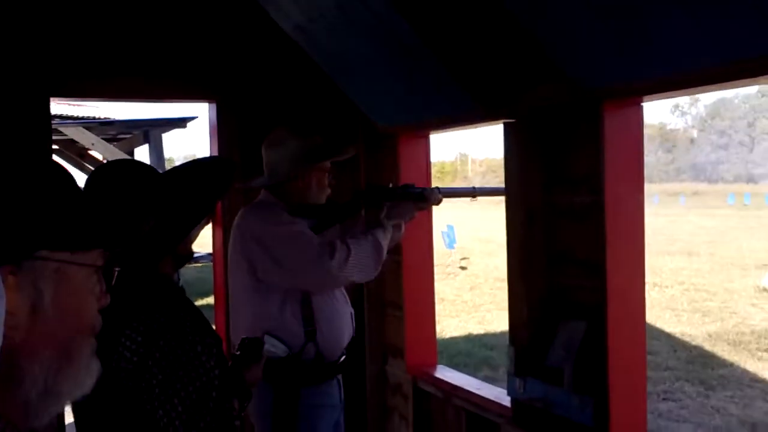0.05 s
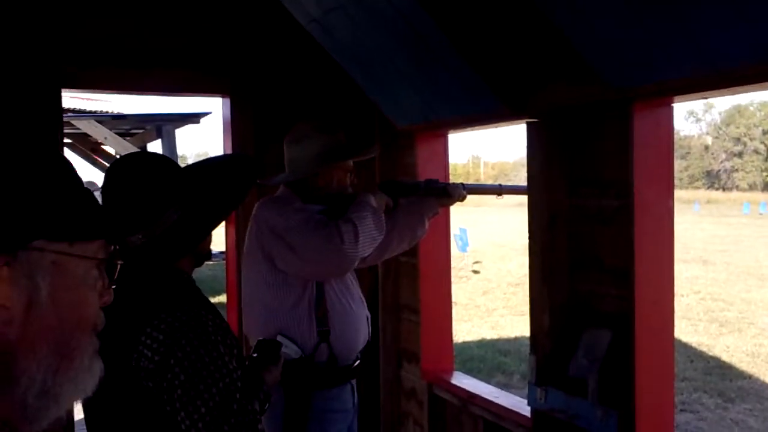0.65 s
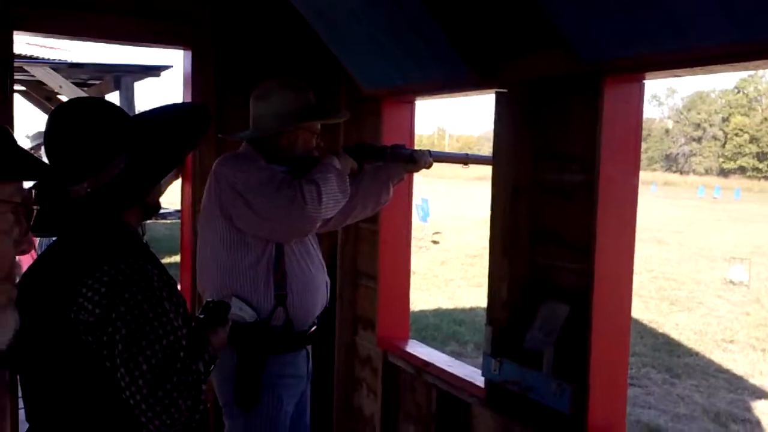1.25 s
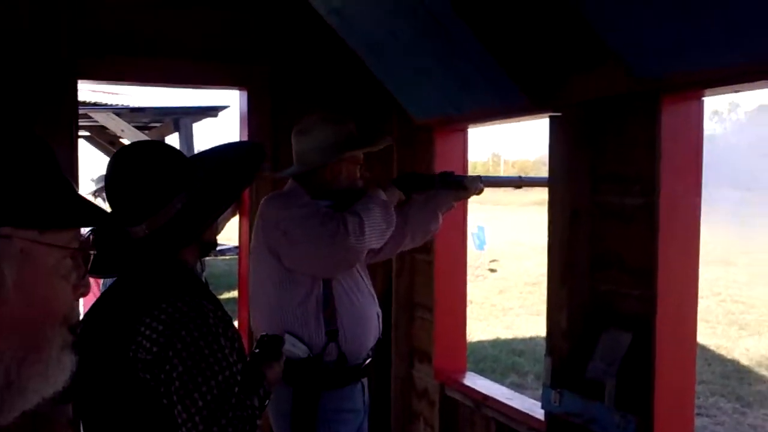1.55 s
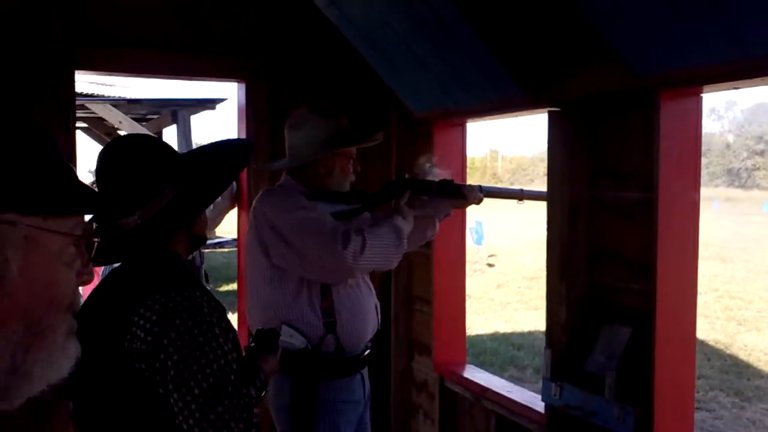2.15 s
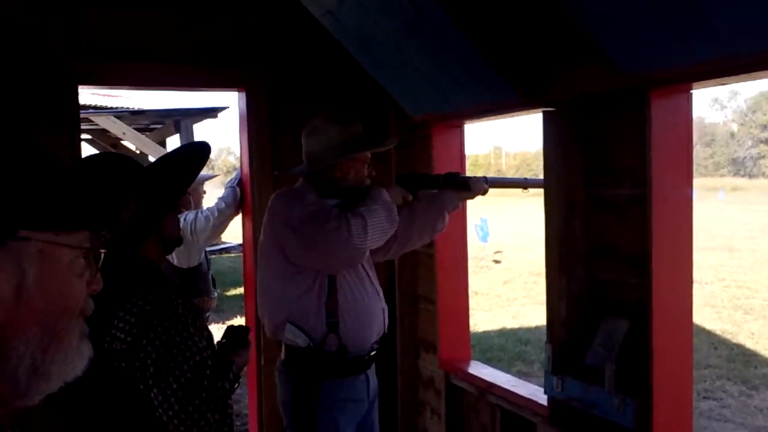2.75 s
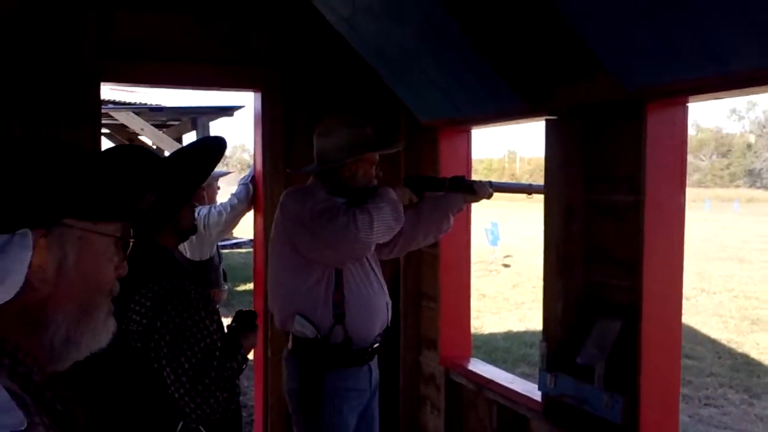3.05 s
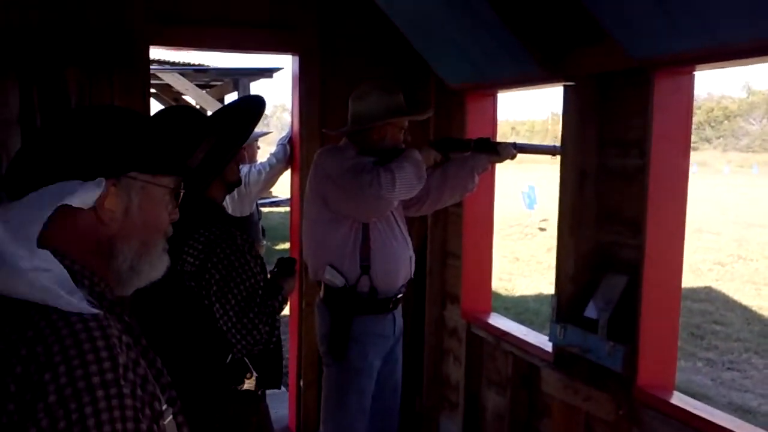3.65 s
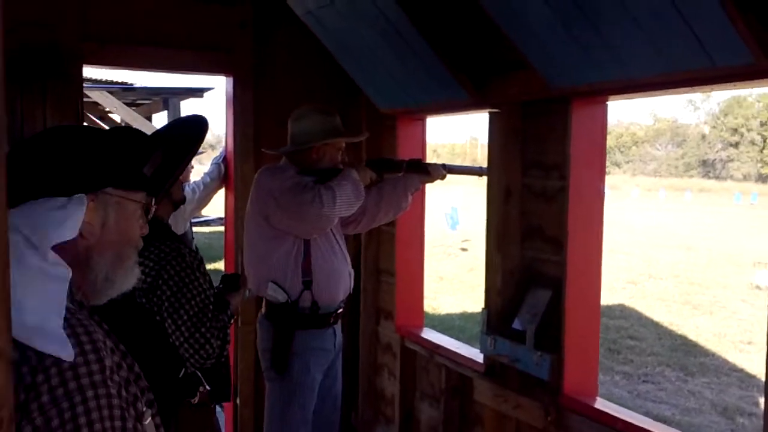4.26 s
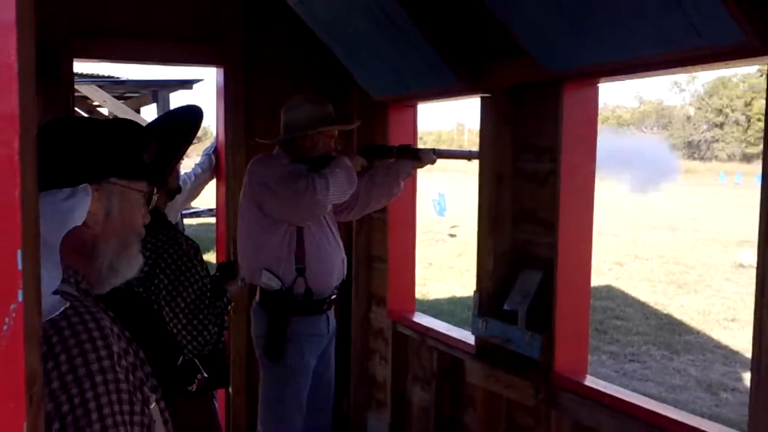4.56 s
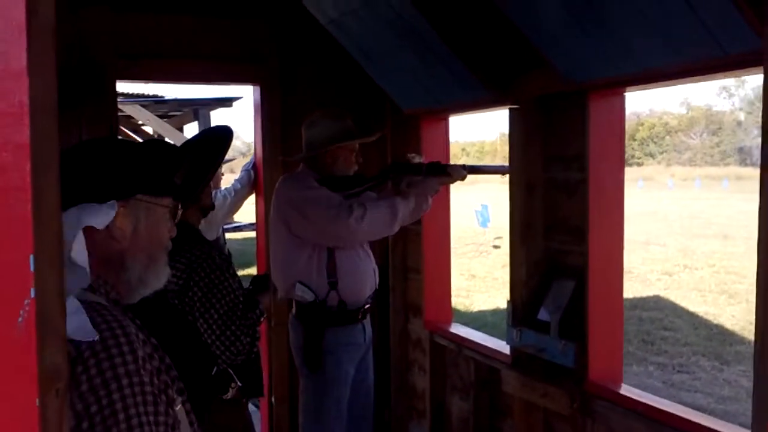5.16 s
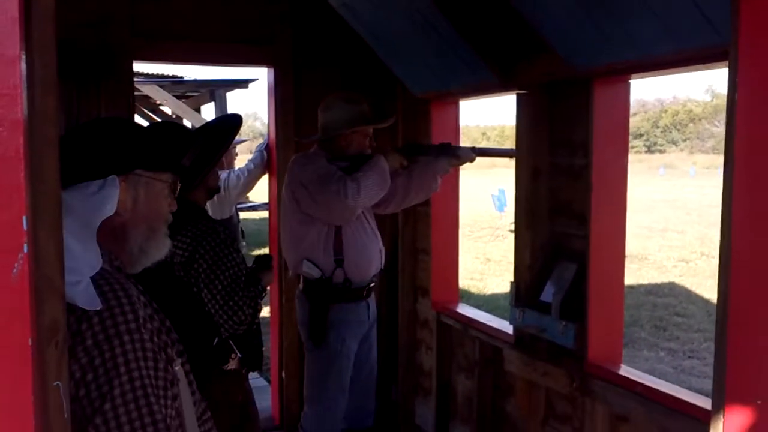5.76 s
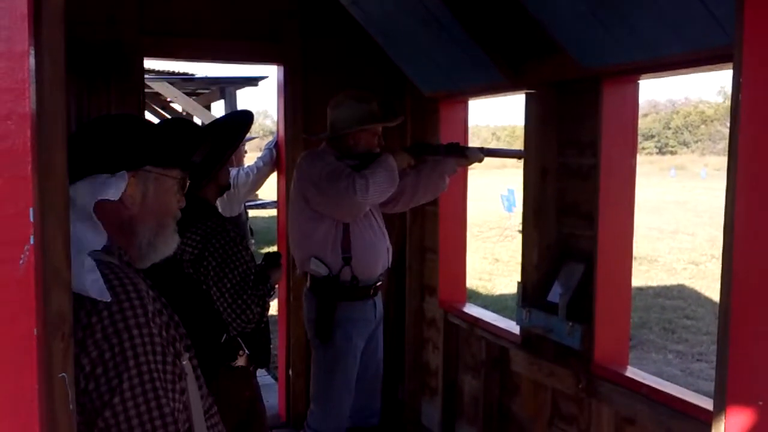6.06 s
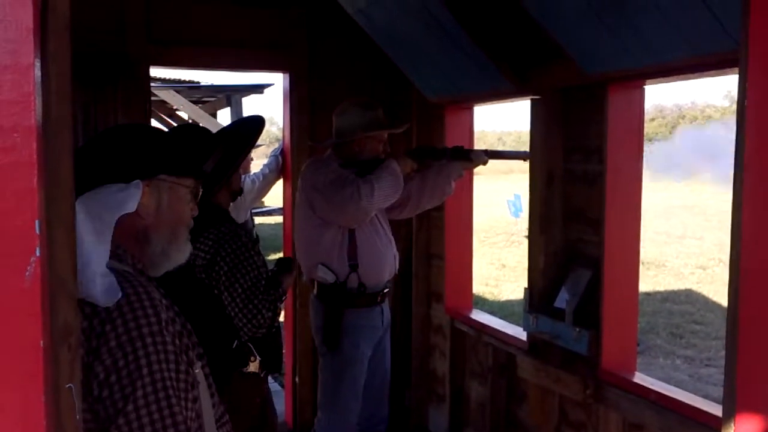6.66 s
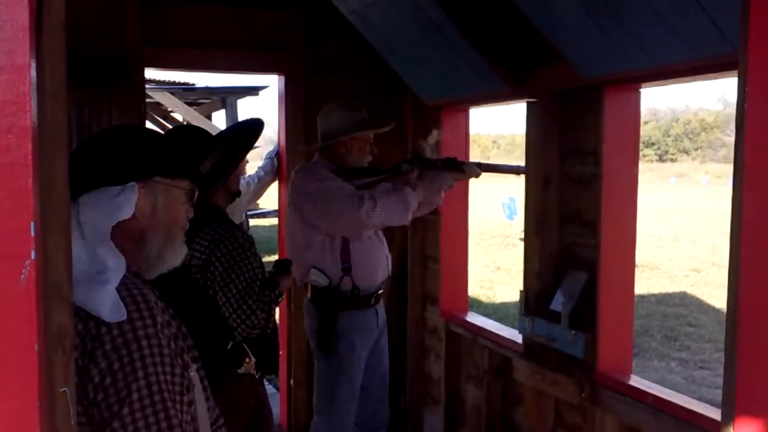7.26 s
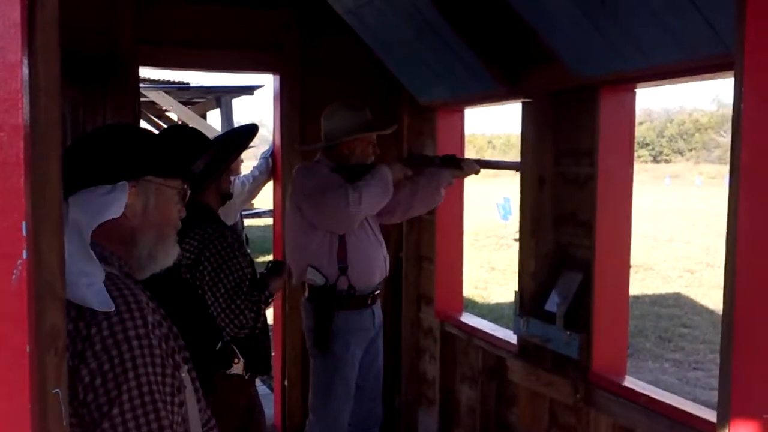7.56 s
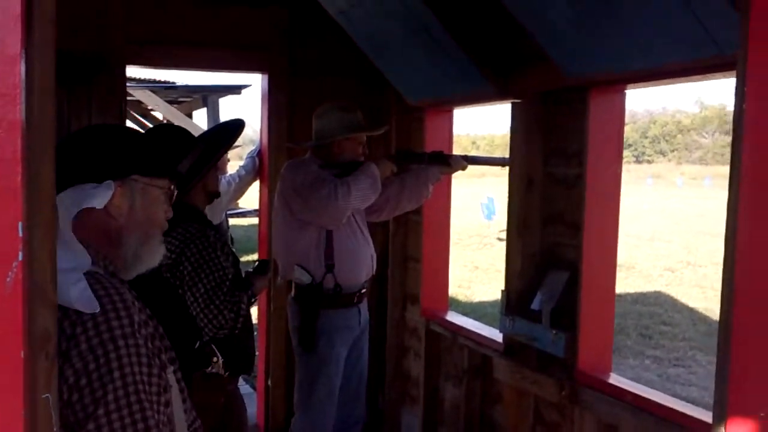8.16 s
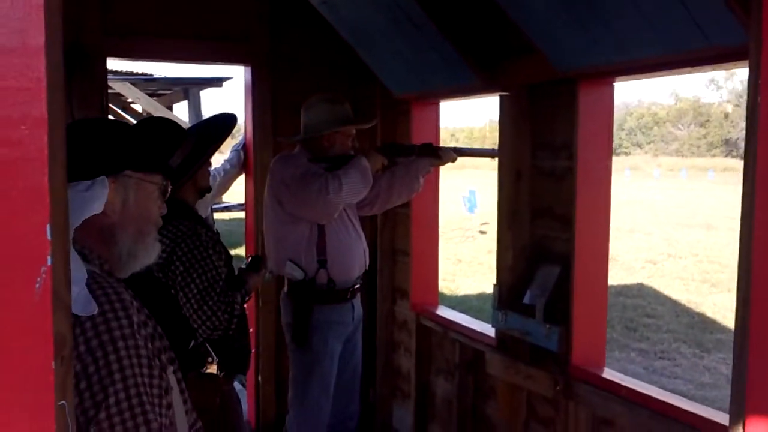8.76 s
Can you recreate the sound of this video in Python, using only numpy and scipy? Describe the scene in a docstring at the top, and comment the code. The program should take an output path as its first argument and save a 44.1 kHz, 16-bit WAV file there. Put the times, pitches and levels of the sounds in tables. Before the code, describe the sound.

A fading gunshot echo and a ringing steel target give way to a rifle lever clacking and a brass case landing. Three close, distorted rifle shots then boom through a wooden shed and roll back from down range, each answered by a plate's ring and the lever opening and shutting. Neighbouring and distant guns fire throughout while low wind puffs buffet the microphone. A faint jingle precedes one final shot.

```python
"""Outdoor range, from inside a wooden shed: a small camera microphone beside a lever-action rifle.
We open on a shot's echo and a ringing steel plate; the lever clacks, the next bay fires, a case falls.
Wind flutters on the microphone and guns pop down the line. Three more blasts from the window overload it,
each booming in the shed and rolling back from berm and trees, followed by a plate and the lever.
Late on, two more cases land faintly, loose metal jingles, and a last blast goes off just before the end."""
import sys
import numpy as np
from scipy import signal
from scipy.fft import rfft, irfft
from scipy.io import wavfile

SR = 44100
rng = np.random.default_rng(int(sys.argv[2]) if len(sys.argv) > 2 else 0)


def store_wav(level_fs):
    """Save 16-bit WAV to argv[1]."""
    pcm = np.round(np.clip(np.atleast_2d(level_fs), -1, 1) * 32767)
    wavfile.write(sys.argv[1], SR, pcm.T.astype(np.int16))


N = 396900

# Decay in the shed and off the trees. Each row: frequency in Hz, t60 in seconds at a stretch of 1.
SHED_RING = [(60, 1.87), (400, 1.38), (1500, 1.235), (4500, 1.26), (10000, 0.97)]
TREES_RING = [(100, 3.6), (800, 2.41), (2000, 1.66), (4500, 1.31), (10000, 1)]

# Noise spectra at the microphone. Each row: frequency in Hz, relative density in dB.
AIR_SPECTRUM = [(25, -10), (90, -3), (300, -6), (900, -4), (1800, -16), (3500, -18.5), (6000, -18),
                (9000, -11), (11000, -17)]
WIND_SPECTRUM = [(20, -17), (45, 5), (90, 4), (150, 2.5), (290, -6), (420, -16.5), (700, -14.5),
                 (2000, -51), (10000, -84)]
PUFF_SPECTRUM = [(20, -18), (60, -7.5), (130, 1), (280, 0.5), (380, -7.5), (520, -18.5), (1000, -36),
                 (10000, -80)]
TICK_SPECTRUM = [(100, -10), (1500, -16), (4300, -15), (5300, 1), (6300, -7), (8200, 1), (11000, -15)]
CLACK_SPECTRUM = [(40, -8), (200, -18.5), (500, -11), (1000, -6.5), (2200, -1), (4000, 0), (6500, 1),
                  (8200, 1), (9700, 3), (11000, -5)]
FAR_SPECTRUM = [(40, -26), (300, -11), (550, -15), (850, 0), (1400, 0), (2400, 0.5), (3500, -2.5),
                (5500, -1), (8000, 2.5), (11000, -1.5)]
THUMP_SPECTRUM = [(20, -29), (70, 7.5), (150, -6.5), (350, -2.5), (600, -13.5), (1500, -13.5),
                  (8000, -44.5)]
CRACK_SPECTRUM = [(30, -13), (120, -1.5), (400, -8), (1200, -4), (3000, -7.5), (6000, -9.5), (9000, -3.5),
                  (11000, -10)]
BERM_SPECTRUM = [(30, -18), (150, -13), (420, -15.5), (750, -4.5), (1250, 2.5), (1900, 2.5), (2800, -5.5),
                 (3700, -3), (5000, -7), (8000, -5.5), (11000, -8)]
TREES_SPECTRUM = [(30, -32), (130, -38), (420, -22), (720, -1.5), (1050, -1), (1350, -1), (1900, -1),
                  (2500, -3), (3100, -5.5), (6500, -8), (8500, -7), (11000, -19)]
BLAST_SPECTRUM = [(25, -17), (70, -7), (250, -6.5), (600, -1.5), (1100, 0), (1900, 0), (3000, -2),
                  (4700, -4), (8500, -0.5), (11000, -4)]

# Modes of struck metal. Each row: frequency in Hz, relative level in dB, t60 in seconds.
TINKLE_MODES = [(4340, 0, .35), (5160, -10, .3)]
HIGH_RING_MODES = [(3660, -19, .5), (4851, -7, .6), (5551, -10, .55), (6123, -7, .55), (6230, -8, .55),
                   (6583, -5, .6), (6785, -8, .6), (6990, -7, .5), (7390, -7, .5), (7585, -7, .5),
                   (7850, -4, .55), (7950, -5, .45), (8200, -4, .45), (8520, -4, .5), (8715, -1, .5),
                   (8950, -2, .5), (9125, -6, .5), (9280, -8, .45), (9440, -8, .45), (9591, -2, .5),
                   (9890, -9, .45), (10358, -12, .4)]
THIN_PLATE_MODES = [(824, -10, 0.098), (2330, -8, 0.052), (5023, -13.5, 0.27), (7140, -20, 0.15)]
CASE_LOW_MODES = [(3170, -8, 1.1), (4600, -3, .35), (5030, -4, .55), (5620, -5, .4), (6220, -7, .4),
                  (6790, -6, .4), (7430, -6, .4)]
CASE_BRIGHT_MODES = [(8073, -2, .3), (8537, 0, .38), (9630, -18, .4)]
# Loose metal and the rifle's steel action. Each row: centre in Hz, width in Hz, relative level in dB.
JINGLE_RESONANCES = [(5150, 50, -3), (5280, 60, 0), (5500, 50, -2), (5680, 50, -7), (6950, 90, -10),
                     (7500, 70, -9)]
ACTION_RESONANCES = [(4720, 54, -17), (5850, 120, -12), (6800, 300, -20), (8040, 960, 1), (8730, 120, -13),
                     (9100, 150, -9), (9880, 380, -6)]

# Wind on the microphone, its course and its strongest puffs. Each row: time in seconds, level in dB.
GUSTS = [(0, -36.5), (.75, -39), (1.1, -65), (2.38, -62), (2.48, -33), (2.85, -49), (3.3, -41), (3.75, -31),
         (4.5, -30.5), (4.6, -40.5), (5.7, -30.5), (6.25, -32.5), (6.7, -31.5), (7.3, -42), (7.95, -33.5),
         (8.7, -34.5), (8.8, -56), (8.9, -32)]
PUFFS = [(3.813, -19.5), (3.881, -22), (4.023, -23.5), (4.144, -25), (4.238, -22), (5.339, -19),
         (5.704, -24), (5.861, -21.5), (6.058, -20.5), (6.122, -19.5), (6.267, -22.5), (8.036, -27)]
# Small metal sounds. Each row: start in seconds, level in dB.
JINGLES = [(3.9575, -40), (7.935, -41), (8.2857, -30), (8.306, -35), (8.401, -34), (8.878, -39)]  # the clearest touches of loose metal
TINKLES = [(8.635, -41), (8.77, -44)]  # faint, lingering tones
THIN_PLATE_HITS = [(6.3695, -14)]  # far down range
CASE_BOUNCES = [(.7387, 1.5), (.825, -17), (1.09, -28), (1.268, -50)]
# Guns down the line. Each row: start in seconds, level in dB, decay stretch, treble cutoff in Hz.
FAR_SHOTS = [(.715, -12, 0.4, 4000), (0.9, -5, 0.1, 2200), (1.266, -14, 0.11, 3430),
             (1.415, -9.5, 0.19, 3460), (2.2669, -5.5, .14, 3650), (2.7866, 2.5, .2, 3950),
             (5.934, -.5, .19, 4700), (6.367, -12, 0.22, 2660), (6.6236, -23, 0.26, 2620),
             (6.681, -29, 0.39, 2780), (7.299, -6, .08, 2630), (7.9806, -1.5, 0.21, 4660),
             (8.433, -10.5, 0.23, 1940), (8.623, -19, 0.19, 2700), (8.679, -23, 0.36, 2380)]
# The gun next door. Each row: start in seconds, crack in dB, echo delay in seconds, berm slap in dB.
NEXT_BAY_SHOTS = [(.541, -6.5, .18, -6), (1.675, -14, .18, -5.5), (3.002, -5.5, .172, -2),
                  (5.131, -6, .16, -9.5)]
# Ringing metal: loud hits on steel plates, and two faint high rings of spent cases landing.
# Each row: start in seconds, impact in dB, ring in dB.
METAL_HITS = [(-.03, -5, -6), (1.868, -8, -5), (4.9233, -3, -12), (5.3262, 1, -0.5), (6.143, -44, -35),
              (7.0387, 2, -2.5), (7.8213, -33, -35.5)]
# Working the lever. Each row: times fully open and locked shut in seconds, level in dB,
# lengths of the opening and closing strokes in seconds.
LEVER_CYCLES = [(.2154, .4888, 0, .037, .074), (2.111, 2.4318, 0, .029, .061),
                (5.2868, 5.5706, -1, .031, .055), (7.257, 7.5625, -1, .042, .059)]
# Contacts in a stroke. Each row: offset from the stop in strokes, clack in dB, ring in dB, decay stretch.
OPENING_CONTACTS = [(-1, -14, -14, 0.64), (0, -6, -9.5, 0.2)]  # the bolt unlocks, then hits its rear stop
CLOSING_CONTACTS = [(-1, -18.5, -27, 0.38), (-.53, -18.5, -22, 0.36), (0, -5, -1, .25),
                    (0.92, -7.5, -25, .16)]  # carrier lifts, round feeds, bolt locks, lever seats
# The rifle, close up. Each row: start in seconds, blast in dB, decay stretch, berm in dB, trees in dB.
RIFLE_SHOTS = [(-.36, 12, .36, 0, -6.5), (1.546, 13, 0.43, 2.5, -5.5), (4.6777, 15, 0.3, -12, -14.5),
               (6.7655, 12.5, .37, -5.5, -5.5), (8.937, 12.5, 0.24, -7, -12)]


def undb(db):
    """Decibels to gain."""
    return 10 ** (np.asarray(db) / 20)


def unit(x):
    """Scale to rms 1."""
    return x / np.sqrt(np.mean(x ** 2))


def clock(seconds):
    """Sample times from zero."""
    return np.arange(int(seconds * SR)) / SR


def fade(t, t60):
    """Exponential decay by 60 dB in t60 seconds."""
    return np.exp(-np.log(1000) * t / np.maximum(t60, 1e-3))


def rise(t, seconds):
    """Exponential attack from 0 towards 1."""
    return 1 - np.exp(-t / seconds)


def add(out, at, x):
    """Mix x into out, starting at the given second."""
    start = int(round(at * SR))
    first, last = max(start, 0), min(start + len(x), N)
    if last > first:
        out[first:last] += x[first - start:last - start]


def along(points, hz):
    """Read (Hz, value) points on a log-frequency axis."""
    centres, values = np.transpose(points)
    return np.interp(np.log(hz + 1), np.log(centres), values)


def noise(t, colour):
    """Noise of rms 1 with the given spectrum."""
    db = along(colour, np.fft.rfftfreq(len(t), 1 / SR))
    white = rng.standard_normal(len(t))
    return unit(irfft(rfft(white) * undb(db), len(t)))


def walk(t, rate):
    """Random level of spread near 1 that moves rate times a second."""
    steps = rng.standard_normal(4096)
    return np.interp(t * rate, np.arange(len(steps)), steps)


def scattered(start, length, count):
    """Loosely spaced random moments, each with a random strength of spread 1."""
    jitter, size = rng.random((count, 2)).T
    times = start + length * (np.arange(count) + jitter) / count
    return times, np.sqrt(3) * (2 * size - 1)


def burst(t, colour, stretch=1, ring=SHED_RING, patchy_db=0):
    """Dense reflections: noise bands die away, each in its t60 times stretch, and flicker by patchy_db."""
    spectrum, hz = rfft(noise(t, colour)), np.fft.rfftfreq(len(t), 1 / SR)
    centres, t60s = np.transpose(ring)
    out = np.zeros(len(t))
    for weights, t60 in zip(np.eye(len(ring)), t60s):
        band = irfft(spectrum * along(np.c_[centres, weights], hz), len(t))
        out += band * fade(t, t60 * stretch) * undb(patchy_db * walk(t, 60.08))
    return out


def rattle(t, resonances):
    """A crowd of close, damped modes: noise confined to a few resonances."""
    hz = np.fft.rfftfreq(len(t), 1 / SR)
    gain = sum(undb(db) / (1 + (2 * (hz - centre) / width) ** 2) for centre, width, db in resonances)
    phases = np.exp(2j * np.pi * rng.random(len(hz)))
    return unit(irfft(gain * phases, len(t)))


def metal(modes, scatter_db, waver):
    """Struck metal: each blow weights the modes anew, and reflections make each one waver."""
    t = clock(1)
    freqs, db, t60s = np.transpose(modes)
    gains = undb(db + scatter_db * rng.standard_normal(len(freqs)))
    gains /= np.sqrt(np.sum(gains ** 2) / 2)
    out = np.zeros(len(t))
    for hz, gain, t60 in zip(freqs, gains, t60s):
        level = gain * fade(t, t60) * (1 + waver * walk(t, 70))
        phase = 2 * np.pi * (hz * t + rng.random()) + 2 * waver * walk(t, 70)
        out += level * np.sin(phase)
    return out


def wind(flutter_db=5, gust_db=-4, eddy_db=-1, eddies_per_s=5, puff_s=0.013, air_db=-46):
    """Eddies buffet the microphone in low puffs that grow with the wind, over steady outdoor air."""
    t, puff_t = np.arange(N) / SR, clock(0.16)
    course = np.transpose(GUSTS)
    out = noise(t, WIND_SPECTRUM) * undb(np.interp(t, *course) + gust_db + flutter_db * walk(t, 32))
    times, _ = scattered(0, N / SR, count=eddies_per_s * N // SR)
    eddies = list(zip(times, np.interp(times, *course) + eddy_db))
    middle = puff_t[-1] / 2
    swell = np.exp(-np.abs(puff_t - middle) / puff_s)
    for at, db in PUFFS + eddies:
        puff = unit(noise(puff_t, PUFF_SPECTRUM) * swell) * np.sqrt(np.mean(swell ** 2))
        add(out, at - middle, undb(db) * puff)
    air = undb(air_db + walk(t, 4.79)) * noise(t, AIR_SPECTRUM)
    return out + air


def loose_metal(shake_db=-39.5, scatter_db=3.5, shimmer_db=-5.5):
    """Loose bits of metal touch: faint ticks with a short shimmer, now and then a lingering tone."""
    out, t = np.zeros(N), clock(.5)
    times, sizes = scattered(start=8.115, length=0.35, count=8)
    shake = list(zip(times, shake_db + scatter_db * sizes))
    for at, db in JINGLES + shake:
        tick = burst(t, TICK_SPECTRUM, stretch=0.19)
        shimmer = undb(shimmer_db) * rattle(t, JINGLE_RESONANCES) * fade(t, 0.33)
        add(out, at, undb(db) * (tick + shimmer) * rise(t, 0.00087))
    for at, db in TINKLES:
        add(out, at, undb(db) * metal(TINKLE_MODES, scatter_db=1, waver=.2))
    return out


def far_guns(pop_db=-8, pop_width_hz=1700):
    """Distant reports, dulled on the way, come in at the windows as a hard pop that rings the shed."""
    out, t = np.zeros(N), clock(0.36)
    hard_front = (1 + 1.14 * fade(t, 0.033)) * rise(t, 0.0018)
    for at, db, stretch, cutoff_hz in FAR_SHOTS:
        dulling = signal.butter(2, cutoff_hz, fs=SR, output="sos")
        report = signal.sosfilt(dulling, burst(t, FAR_SPECTRUM, stretch))
        pop = undb(pop_db) * rattle(t, [(0.71 * cutoff_hz, pop_width_hz, 0)]) * fade(t, 0.79 * stretch)
        add(out, at, undb(db) * hard_front * (report + pop))
    return out


def range_echo(berm_db, trees_db, swell_s=0.063):
    """The berm throws back a slap; behind it, the tree line answers with a long, grainy roll."""
    t = clock(1.6)
    slap = burst(t, BERM_SPECTRUM, stretch=0.44, patchy_db=3.5) * (0.21 + 0.79 * rise(t, 0.01))
    roll = burst(t, TREES_SPECTRUM, ring=TREES_RING, patchy_db=2.5) * rise(t, swell_s) ** 2
    grain = undb(1.8 * walk(t, 500))
    return (undb(berm_db) * slap + undb(trees_db) * roll) * grain


def next_bay(thump_db=-5.5, boom_db=-6, sweep_s=.026, sweep_hz=1400, boom_s=0.012):
    """The gun next door, heard round the wall: bass thumps first, then the boom sweeps up into a crack."""
    out, t = np.zeros(N), clock(0.94)
    pitch_hz = sweep_hz * np.minimum(t / sweep_s, 1.25) ** 2
    sweep = np.exp(2j * np.pi * np.cumsum(pitch_hz) / SR)
    # a first snap, a short lull, then the shed fills
    crack_shape = 1 - 1.14 * np.exp(-t / 0.0095) + 0.58 * fade(t, 0.021)
    for at, crack_db, echo_s, berm_db in NEXT_BAY_SHOTS:
        thump = noise(t, THUMP_SPECTRUM) * fade(t, 0.15) * rise(t, 0.0013)
        rising_band = (walk(t, 1500) + 1j * walk(t, 1500)) * sweep
        boom = rising_band.real * np.exp(-((t - sweep_s) / boom_s) ** 2)
        crack = burst(t, CRACK_SPECTRUM, stretch=0.5) * crack_shape
        add(out, at, undb(thump_db) * thump + undb(boom_db) * boom + undb(crack_db) * crack)
        add(out, at + echo_s, range_echo(berm_db, trees_db=-6))
    return out


def ringing_metal():
    """Steel plates ring when hit down range; two spent cases land with a faint high ring."""
    out, t = np.zeros(N), clock(0.39)
    for at, impact_db, ring_db in METAL_HITS:
        add(out, at, undb(impact_db) * burst(t, CLACK_SPECTRUM, stretch=0.34))
        add(out, at, undb(ring_db) * metal(HIGH_RING_MODES, scatter_db=2.5, waver=.4))
    for at, db in THIN_PLATE_HITS:
        add(out, at, undb(db) * metal(THIN_PLATE_MODES, scatter_db=1, waver=.15))
    return out


def spent_case(tick_db=-8, low_db=-12):
    """A brass case lands, ringing like a tiny bell; soft bounces lose the tick and keep the low modes."""
    out, t = np.zeros(N), clock(0.44)
    for at, db in CASE_BOUNCES:
        add(out, at, undb(tick_db + 1.25 * db) * burst(t, TICK_SPECTRUM, stretch=.2))
        add(out, at, undb(low_db + .5 * db) * metal(CASE_LOW_MODES, scatter_db=2, waver=.3))
        add(out, at, undb(db) * metal(CASE_BRIGHT_MODES, scatter_db=.5, waver=.3))
    return out


def lever(ring_t60=0.2):
    """Close by, the lever swings open and shut; steel parts meet with a bright clack and a short ring."""
    out, t = np.zeros(N), clock(.5)
    hard_front = 1 + 0.28 * fade(t, 0.014)
    for open_at, shut_at, db, opening_s, closing_s in LEVER_CYCLES:
        strokes = (open_at, opening_s, OPENING_CONTACTS), (shut_at, closing_s, CLOSING_CONTACTS)
        for stop_at, stroke_s, contacts in strokes:
            for offset, clack_db, ring_db, stretch in contacts:
                clack = undb(clack_db) * burst(t, CLACK_SPECTRUM, stretch) * hard_front
                ring = undb(ring_db) * rattle(t, ACTION_RESONANCES) * fade(t, ring_t60)
                add(out, stop_at + offset * stroke_s, undb(db) * (clack + ring) * rise(t, 0.00025))
    return out


def rifle(hammer_db=-22, hammer_lead_s=.007, fill_s=0.013, berm_echo_s=.221):
    """The hammer falls, the muzzle blast fills the shed, then comes back from down range."""
    out, t = np.zeros(N), clock(1)
    for at, db, stretch, berm_db, trees_db in RIFLE_SHOTS:
        hammer = noise(t, CLACK_SPECTRUM) * fade(t, 0.26) * rise(t, 0.0013)
        blast = burst(t, BLAST_SPECTRUM, stretch, patchy_db=1.5) * rise(t, fill_s)
        add(out, at - hammer_lead_s, undb(hammer_db) * hammer)
        add(out, at, undb(db) * blast)
        add(out, at + berm_echo_s, range_echo(berm_db, trees_db))
    return out


def scene():
    """Everything that reaches the microphone in the shed, in mono."""
    guns = rifle() + next_bay() + far_guns()
    return (guns + ringing_metal() + lever() + spent_case() + loose_metal() + wind())[None]


def record(dry, bass_hz=30, treble_hz=10300, leak_db=-32, ceiling=.71, top_hz=15900):
    """The microphone passes little deep bass or top octave, and the blasts drive its amplifier flat."""
    treble_cut = signal.ellip(7, .5, 50, treble_hz, fs=SR, output="sos")
    bass_cut = signal.butter(1, bass_hz, "high", fs=SR, output="sos")
    x = signal.sosfilt(treble_cut, dry) + undb(leak_db) * dry
    x = signal.sosfilt(bass_cut, x)
    x = x / (1 + np.abs(x / ceiling) ** 4) ** (1 / 4)  # soft overload
    x = signal.sosfiltfilt(signal.butter(2, 14500, fs=SR, output="sos"), x)
    return signal.sosfiltfilt(signal.ellip(8, .05, 50, top_hz, fs=SR, output="sos"), x)


dry = scene()
out = record(dry)
store_wav(out)
```